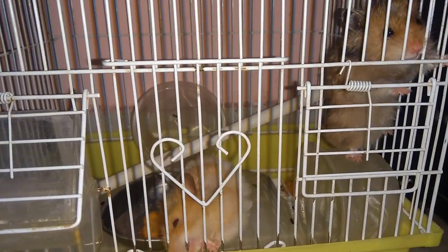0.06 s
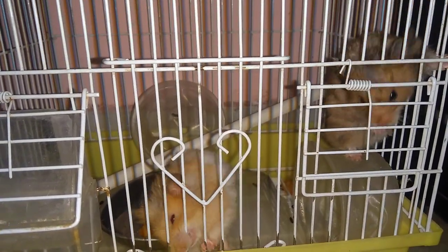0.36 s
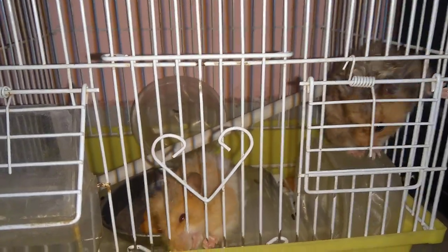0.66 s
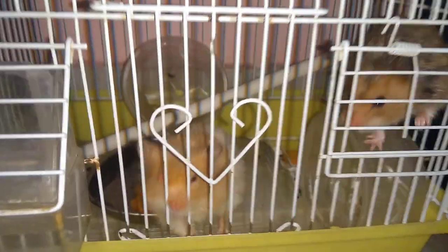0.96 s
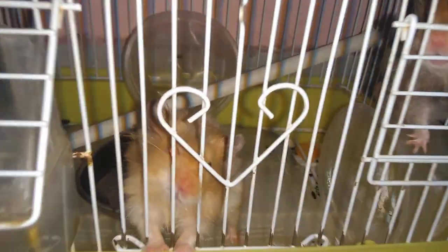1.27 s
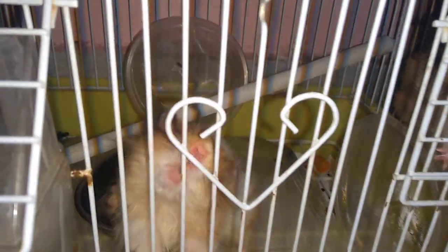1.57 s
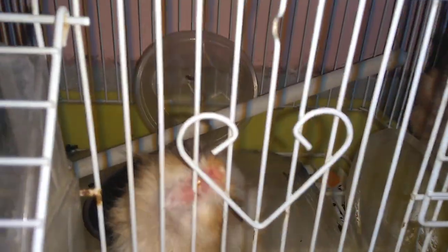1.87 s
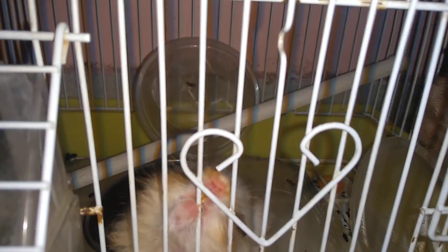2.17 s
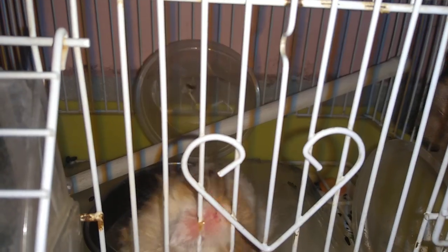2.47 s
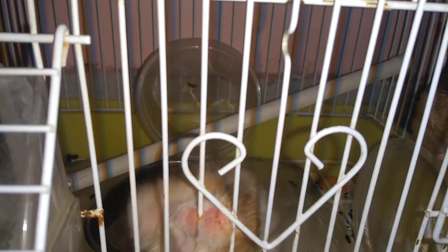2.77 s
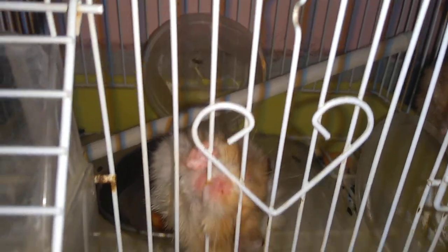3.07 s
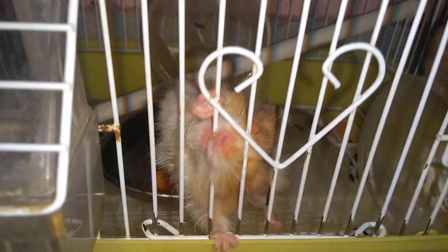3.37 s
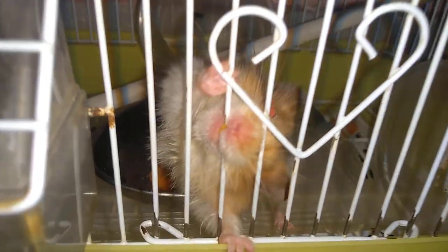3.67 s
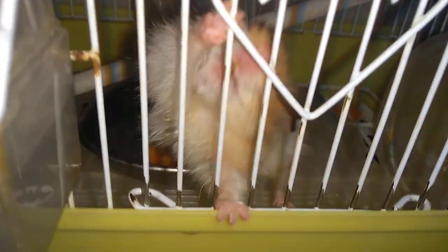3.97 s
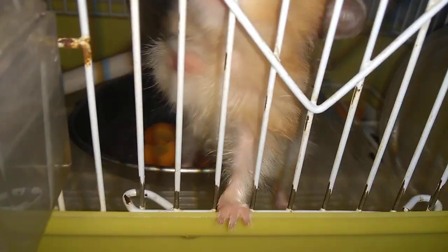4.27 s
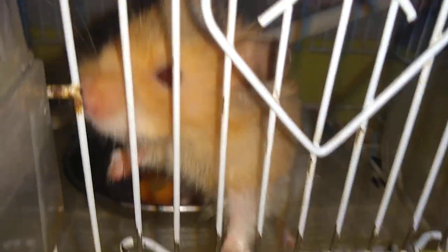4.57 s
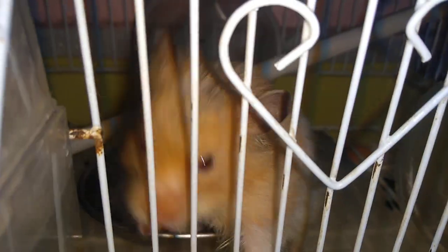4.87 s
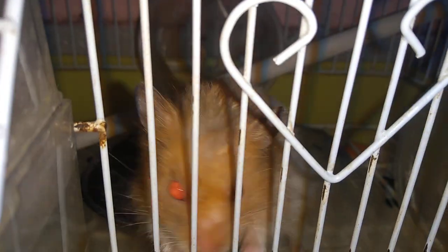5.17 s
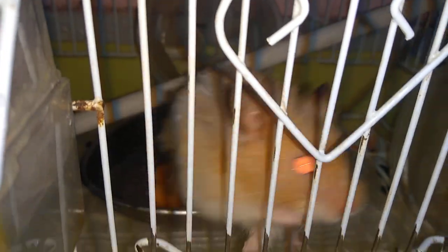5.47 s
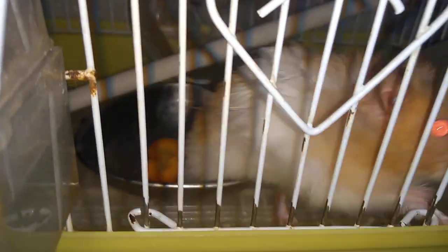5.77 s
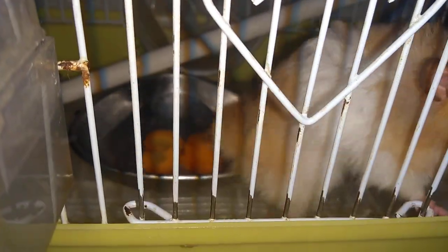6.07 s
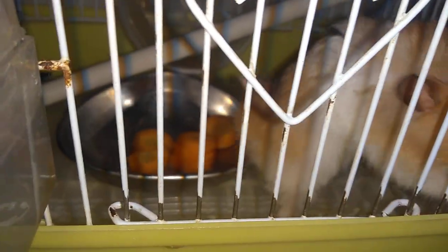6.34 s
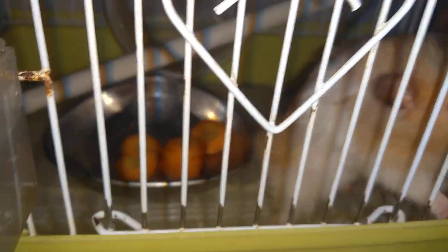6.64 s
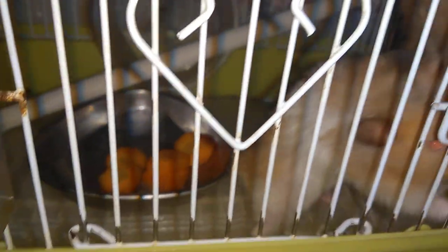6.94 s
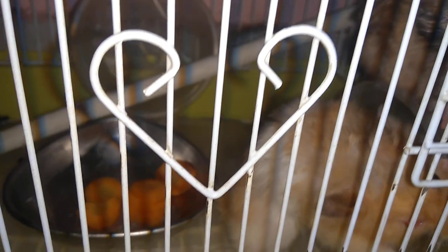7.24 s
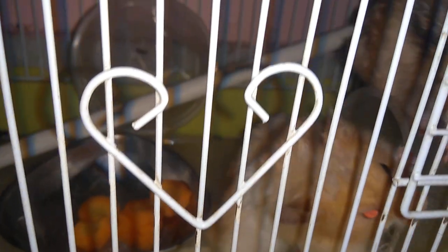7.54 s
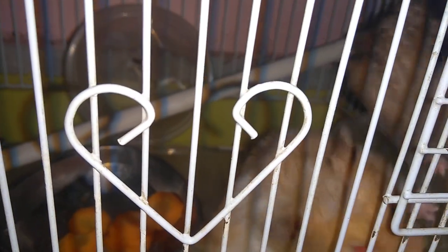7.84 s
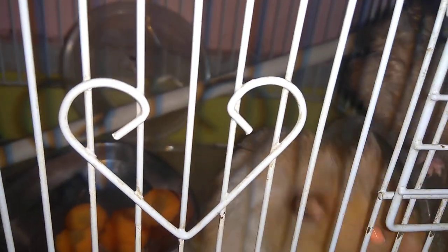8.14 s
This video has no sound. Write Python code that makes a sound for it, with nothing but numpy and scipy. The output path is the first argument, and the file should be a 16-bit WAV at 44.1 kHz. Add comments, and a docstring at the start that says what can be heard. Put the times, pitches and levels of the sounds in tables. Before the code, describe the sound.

A fan's steady hum and hiss fill a small room, with a low shuffle of the hand holding the microphone. Close by, hamsters gnaw and pluck wire cage bars, making uneven metallic clicks that ring and spring back. A soft thump comes about halfway, then a brief high squeak and sparser taps. Near the end, strained plastic ticks and gives two sharp snaps on the right, the second louder.

```python
"""A small hard room, where two hamsters clamber about a wire cage, heard from a handheld phone.
A fan hums and hisses throughout, over the low shuffle of the hand. Wires plucked by teeth and claws
click, ring and spring back; paws touch the bars, there are a few soft bumps, and a claw drags a squeak
from one bar. Beside the right microphone, strained plastic ticks, rubs and finally snaps twice."""
import sys
import numpy as np
from scipy import signal
from scipy.fft import rfft, irfft
from scipy.io import wavfile

SR = 44100
rng = np.random.default_rng(int(sys.argv[2]) if len(sys.argv) > 2 else 0)


def store_wav(level_fs):
    """Save 16-bit WAV to argv[1]."""
    pcm = np.round(np.clip(np.atleast_2d(level_fs), -1, 1) * 32767)
    wavfile.write(sys.argv[1], SR, pcm.T.astype(np.int16))


N = 366471
TIME = np.arange(N) / SR
AGE = TIME[:SR // 2]  # seconds since a blow
FREQ = np.arange(4097) * SR / 8192  # frequency grid of the filter curves, Hz

# soft bumps: start_s, pitch_hz, level_db
SOFT_BUMPS = [(1.02, 121, -37), (1.125, 58, -45), (2.663, 133, -32.5), (3.902, 85.4, -18.5),
              (3.959, 45, -29), (4.25, 55, -34)]


def undb(db):
    """Decibels to gain."""
    return 10 ** (np.asarray(db) / 20)


def unit(x):
    """Scale to an rms of one."""
    return x / np.sqrt(np.mean(x ** 2))


def fade(t60):
    """Exponential decay after a blow, 60 dB down in t60 seconds."""
    return np.exp(-np.log(1000) * AGE / t60)


def contour(points):
    """EQ curve through (Hz, dB) points."""
    hz, db = np.transpose(points)
    return undb(np.interp(np.log(FREQ + 1), np.log(hz), db))


def peaks(rows):
    """EQ curve of (centre_hz, width_hz, level_db) peaks."""
    return np.sqrt(sum(undb(2 * db) / (1 + (2 * (FREQ - hz) / width) ** 2) ** 2
                       for hz, width, db in rows))


def shape(x, gain):
    """Apply an EQ curve as a minimum-phase filter."""
    cepstrum = irfft(np.log(gain + 1e-5))
    causal = np.r_[cepstrum[0], 2 * cepstrum[1:len(gain) - 1]]
    response = irfft(np.exp(rfft(causal, len(cepstrum))))
    return signal.oaconvolve(x, response[None], axes=1)[:, :x.shape[1]]


def band(x, hz, kind):
    """Gentle low-, high- or band-pass."""
    return signal.sosfilt(signal.butter(2, hz, kind, fs=SR, output="sos"), x)


def steep_high(x, hz):
    """A high-pass applied twice."""
    return band(band(x, hz, "high"), hz, "high")


def noise(size=N):
    """Unrelated white noise for left and right."""
    return rng.standard_normal((2, size))


def flutter(depth_db, rate_hz, size=N):
    """A randomly wavering gain."""
    return undb(depth_db * unit(band(rng.standard_normal(size), rate_hz, "low")))


def pitched_noise(hz, half_width_hz):
    """A narrow band of noise that follows a pitch curve."""
    carrier = np.exp(2j * np.pi * np.cumsum(hz) / SR)
    return unit(np.real(band(noise() + 1j * noise(), half_width_hz, "low") * carrier))


def panned(db):
    """Left and right gains for a left-minus-right level."""
    return undb(np.array([[db], [-db]]) / 2)


def add(out, s, x):
    """Mix a sound in at time s."""
    start = int(s * SR)
    out[:, start:start + x.shape[1]] += x[:, :N - start]


def room(x, wet_db, t60=0.24):
    """Both sides feed a dense short tail, different at each microphone, whose treble dies first."""
    echoes = noise(len(AGE))
    treble = band(echoes, 9000, "high") * fade(.16)
    body = band(band(echoes, 8600, "low"), 10200, "low") * fade(t60)
    tail = (body + treble) * (1 - fade(0.0038))
    tail *= undb(wet_db) / np.sqrt(np.sum(tail ** 2))
    return x + signal.oaconvolve(x.sum(axis=0)[None], tail, axes=1)[:, :x.shape[1]]


def fan(rumble_db=-43, hiss_db=-48, hum_hz=275.3, hum_db=-47.5, hum_db_per_s=0.33, side_db=-19):
    """Rumble and a wavering motor hum sit in the centre; the hiss arrives from all round."""
    # tone of the rumble: frequency_hz, level_db
    rumble_eq = [(20, -33), (32, -9), (48, -3.5), (95, -0.5), (125, -2), (165, 0), (205, 6), (240, 3),
                 (300, 5.5), (345, -1), (420, -5), (560, -15), (1000, -17), (2000, -90)]
    # tone of the hiss: frequency_hz, level_db
    hiss_eq = [(100, -41), (400, -7), (560, -9), (700, -9), (900, -10), (1050, -10), (1280, -6),
               (1600, -10.5), (2250, -9), (3200, -13.5), (6300, -19.5), (8800, -22), (10000, -23),
               (11500, -28.5), (13500, -29.5), (16000, -37)]
    mid, side = unit(shape(noise(), contour(rumble_eq)))
    rumble = undb(rumble_db) * (mid + undb(side_db) * side * np.array([[1], [-1]]))
    level_drift, phase_drift = unit(band(noise(), 2.6, "low"))
    hum_gain = undb(hum_db + hum_db_per_s * TIME + 0.71 * level_drift)
    hum = hum_gain * np.sin(2 * np.pi * hum_hz * TIME + 0.94 * phase_drift)
    return rumble + hum + undb(hiss_db) * unit(shape(noise(), contour(hiss_eq)))


def fan_bounce(db_at_1khz=-48.5, db_per_octave=-3):
    """Hiss bouncing off the cage front reinforces one band, pitched by the moving phone's distance."""
    # path of the reinforced band: time_s, pitch_hz
    glide = [(0, 939.6), (.9, 972), (1.6, 1029), (3.2, 1059), (4.0, 1275), (8.3, 1187)]
    hz = np.interp(TIME, *np.transpose(glide))
    db = db_at_1khz + db_per_octave * np.log2(hz / 1000)
    return undb(db) * pitched_noise(hz, half_width_hz=197)


def fan_hollow():
    """A narrow, hollow band of the hiss rings; as the phone nears the cage it fades from the right."""
    # path of the resonance: time_s, pitch_hz, left_db, right_db
    glide = [(0, 791, -48, -47.5), (0.998, 808, -57, -51), (2.0, 862.5, -53.5, -62.5), (4.4, 872, -55, -69),
             (8.3, 874.5, -54.5, -68)]
    s, hz, left_db, right_db = np.transpose(glide)
    gain = undb([np.interp(TIME, s, left_db), np.interp(TIME, s, right_db)])
    return gain * pitched_noise(np.interp(TIME, s, hz), half_width_hz=48)


def handling(rest_db=-59, moving_db=-50, move_s=0.94):
    """The hand's low shuffle swells around each bump and reaches both sides through the phone's body."""
    moving = np.max([np.exp(-((TIME - s) / move_s) ** 2) for s, _, _ in SOFT_BUMPS], axis=0)
    db = rest_db + (moving_db - rest_db) * moving
    return undb(db) * unit(band(rng.standard_normal(N), [50, 150], "band"))


def wire_click(db, body_db, top_db, rise_t60, ring_t60, top_t60=0.11, spread_db=0.2, detune=0.0094):
    """One blow spreads through the welded bars as a gritty rattle; each bar rings a little differently."""
    # modes of the wires, relative to the broad click: pitch_hz, width_hz, level_db
    wire_modes = [(495, 28, 10), (1375, 60, 10), (2220, 130, 3.5), (3060, 150, 10), (3510, 180, 8.5),
                  (4530, 240, 10), (5680, 160, 7), (6650, 120, 7), (7060, 100, 3), (7470, 51, -2),
                  (7980, 88, 6.5), (8220, 110, 6.5), (8750, 150, 5.5), (9220, 150, 5), (14400, 250, 10),
                  (15600, 220, 7)]
    # tone of the broad click: frequency_hz, level_db
    click_eq = [(200, -27), (550, 4), (1000, 0), (1700, -1), (4000, -2.5), (5000, -1), (7500, 2),
                (9500, -1.5), (11500, 3.5), (13000, -3.5), (15000, -5)]
    grit = flutter(depth_db=3, rate_hz=830, size=len(AGE))
    catches = flutter(depth_db=1.26, rate_hz=107, size=len(AGE))  # the teeth catch and slip
    rattle = noise(len(AGE)) * grit * catches * (1 - fade(rise_t60)) * fade(ring_t60)
    body = undb(body_db) * band(rattle, 1970, "low")
    middle = band(rattle, [2000, 8000], "band")
    top = undb(top_db) * band(rattle, 7000, "high") * fade(top_t60)
    modes = [(hz * (1 + detune * rng.standard_normal()), width, mode_db - rng.normal(0, spread_db))
             for hz, width, mode_db in wire_modes]
    freedom = np.interp(db, [-40, -26], [.35, 1])  # a light touch keeps the paw on and mutes the modes
    colour = unit(contour(click_eq) * np.hypot(1, freedom * peaks(modes)))
    click = undb(db) * shape(body - middle + top, colour)
    return room(click, wet_db=-3)  # every spot has its own echoes


def wire_note(hz, db, t60=0.087):
    """The plucked wire itself sings on briefly with one clean note."""
    note = np.sin(2 * np.pi * hz * AGE) * fade(t60) * (1 - fade(0.0083))
    return room(undb(db) * note * panned(0.4), wet_db=-10)


def wires(pluck_trim_db=-3.5, lead_s=.0014):
    """Plucks, their softer, duller rebounds and light touches ring the same bars."""
    # teeth and claws pluck a wire: start_s, level_db, body_db, top_db, ring_t60_s, note_hz, note_db
    plucks = [(0.0889, -21, -12, -1.5, 0.072, 4683, -20), (0.1144, -28.5, 5, -2, 0.08, 4530, -20),
              (0.2803, -24, 2, -5, 0.055, 4470, -21), (0.9853, -29.5, -5, -1.5, 0.077, 4840, -11),
              (1.3349, -24, 0, -3.5, 0.059, 4530, -18), (1.705, -24, 6, 2, 0.068, 4554, -11),
              (1.8801, -25.5, 5.5, -1.5, 0.063, 4560, -14), (2.2509, -24.5, 6.5, 2.5, 0.067, 4520, -17),
              (2.4584, -29.5, 6.5, -5, 0.058, 4530, -18), (2.8814, -23, 5, 1.5, 0.056, 4600, -19),
              (3.04, -21.5, -5, -1, 0.041, 4500, -18), (3.3083, -25, -1.5, -6, 0.066, 4440, -15),
              (3.489, -25, 4.5, -4, 0.1, 4500, -16), (3.6342, -32.5, 8, 0.5, 0.12, 4520, -16),
              (3.905, -36.5, 3.5, -9, 0.2, 4530, -18), (4.0612, -26, -5, -3, 0.059, 4600, -25),
              (5.302, -30.5, 3.5, -3, .079, 4420, -24)]
    # a released wire springs back against the teeth: start_s, level_db
    rebounds = [(1.741, -37), (2.291, -33), (2.918, -34), (3.539, -35.5), (3.672, -36.5), (3.942, -40),
                (5.355, -41)]
    # paws and teeth touch the bars lightly: start_s, level_db, ring_t60_s
    touches = [(0.083, -36.5, 0.056), (0.5212, -39.5, 0.044), (0.5344, -42, .07), (0.5844, -48, .04),
               (0.617, -43.5, 0.087), (0.6444, -44.5, 0.11), (0.7946, -40.5, 0.09), (0.9765, -39.5, .04),
               (1.0979, -39, 0.047), (1.3179, -38, 0.053), (1.4057, -36.5, 0.043), (1.4536, -43, 0.057),
               (1.6144, -44.5, .04), (2.2124, -43, 0.075), (3.2485, -41, 0.082), (4.2707, -43, .11),
               (5.7927, -44, 0.1), (5.9918, -41, .1), (6.0362, -43.5, 0.13), (6.0741, -41, 0.031),
               (7.441, -46, 0.1), (7.6494, -42, 0.063)]
    out = np.zeros((2, N))
    for s, db, body_db, top_db, t60, note_hz, note_db in plucks:
        pluck_db = db + pluck_trim_db
        add(out, s, wire_note(note_hz, pluck_db + note_db))
        add(out, s - lead_s, wire_click(pluck_db, body_db, top_db, rise_t60=0.014, ring_t60=t60))
    for s, db in rebounds:
        add(out, s - lead_s, wire_click(db, body_db=3, top_db=-13, rise_t60=0.013, ring_t60=0.052))
    for s, db, t60 in touches:
        add(out, s - lead_s, wire_click(db, body_db=5, top_db=-16.5, rise_t60=0.015, ring_t60=t60))
    return out


def bumps(t60=0.24, rise_t60=0.017):
    """Each soft knock swells and dies away as one low tone."""
    out = np.zeros((2, N))
    for s, hz, db in SOFT_BUMPS:
        thud = -np.sin(2 * np.pi * hz * AGE) * fade(t60) * (1 - fade(rise_t60))
        add(out, s, undb(db) * thud * panned(-0.3))
    return out


def thin_scrapes(t60=0.036):
    """Faint, thin, high scrapes, one leading into a plastic tick."""
    # short, high scrapes: start_s, level_db
    scrapes = [(2.5605, -35), (7.357, -36), (7.401, -28)]
    out = np.zeros((2, N))
    for s, db in scrapes:
        rasp = band(noise(len(AGE)), [8300, 10700], "band") * fade(t60) * (1 - fade(0.011))
        add(out, s, undb(db) * rasp)
    return room(out, wet_db=-9)


def plastic_ring(position, rise_t60=0.0039):
    """The plastic rings; where it gives way (0 rim, 1 middle) sets the balance of its modes."""
    # modes of the plastic: pitch_hz, t60_s, rim_db, middle_db
    modes = [(413, 0.021, -22, -9), (598, 0.016, -8, -10), (900, 0.038, -21, -21.5), (1390, 0.0067, 6, -29),
             (2316, 0.026, -12, -24), (3150, 0.012, -4, -34), (3360, 0.0098, -12, -0.5),
             (3640, 0.011, -33, -9), (4750, 0.013, -22, -6.5), (5380, 0.013, -23, -13.5),
             (5950, 0.011, -19, -13), (6700, .012, -25, -20), (7800, 0.016, -16, -15.5),
             (8600, 0.015, -11, -18), (9270, .012, -18, -21), (10300, 0.012, -13, -35),
             (11470, 0.011, -15, -32)]
    ring = 0
    for hz, t60, rim_db, middle_db in modes:
        gain = undb(rim_db + position * (middle_db - rim_db))
        ring -= gain * np.cos(2 * np.pi * hz * AGE) * fade(t60)
    return ring * (1 - fade(rise_t60))


def plastic_ticks(ring_db=-3, crack_db=-5, edge_db=-37, crack_t60=0.018, catch_s=0.0073):
    """The plastic slips slightly, catching twice; even the softest tick has a thin, bright edge."""
    # small slips close by: start_s, level_db, pan_db (positive is left), knock_db, second_catch_db
    slips = [(2.5652, -24.5, -1, 2, -5), (5.453, -36, -16, -5, -9), (6.4335, -53, -8, 0, -12),
             (7.5535, -30, -2, -6, -20), (7.6332, -30, 6, -4, -10), (7.924, -22, 3, 3, -22)]
    ring = undb(ring_db) * plastic_ring(position=0.7) * panned(-18)
    out = np.zeros((2, N))
    for s, db, pan_db, knock_db, catch_db in slips:
        for delay_s, slip_db in [(0, 0), (catch_s, catch_db)]:
            burst = noise(len(AGE)) * fade(crack_t60)
            edge = undb(edge_db) * steep_high(burst, 9800)
            knock = undb(knock_db) * band(burst, [600, 1700], "band")
            crack = undb(crack_db) * band(burst, 9400, "low")
            tick = edge + undb(db) * (ring + knock + crack)
            add(out, s + delay_s, undb(slip_db) * panned(pan_db) * tick)
    return room(out, wet_db=-9)


def bar_squeak(start_s=4.9525, db=-27.5, rasp_db=-24, split_hz=5800):
    """A claw drags down a bar in uneven slips; the lower bands of noise join as it presses harder."""
    # bands of noise that colour the short, rough squeak: centre_hz, width_hz, level_db
    noise_bands = [(2420, 490, -7), (4590, 270, -3), (4860, 240, -3.5), (5430, 150, -10), (6680, 380, 3),
                   (6900, 240, -5), (7200, 260, 4.5), (7650, 300, -10), (8270, 400, -6), (8800, 260, -6),
                   (9040, 260, -3), (9500, 280, -10), (10600, 350, -15)]
    swell_s, hold_s, release_s, swell_db = .011, .0135, .012, 10
    age = TIME - start_s
    swell = undb(swell_db * (np.clip(age / swell_s, 0, 1) - 1))
    release = np.clip(1 - (age - swell_s - hold_s) / release_s, 0, 1) ** 2
    grip = (age > 0) * swell * release
    slips = flutter(depth_db=2, rate_hz=700) * noise() * grip * undb(db)
    low = peaks([row for row in noise_bands if row[0] < split_hz])
    high = peaks([row for row in noise_bands if row[0] >= split_hz])
    squeak = (shape(slips * swell, low) + shape(slips, high)) / np.sqrt(np.mean(low ** 2 + high ** 2))
    rasp = undb(rasp_db) * band(slips, 9000, "high")
    return room((squeak + rasp) * panned(-2), wet_db=-8.5)


def plastic_rub(start_s=7.24, end_s=7.93, end_db=-52, db_per_s=8):
    """A faint, uneven rub grows with the strain until the last snap releases it."""
    strain = (TIME > start_s) * (TIME < end_s) * undb(end_db + db_per_s * (TIME - end_s))
    uneven = flutter(depth_db=3, rate_hz=60)
    colour = contour([(300, -6), (650, 13), (1600, -8), (3800, 1), (7000, -6), (10000, -5),
                      (12000, -16), (15000, -12)])
    return unit(shape(noise(), colour)) * strain * uneven * panned(-2)


def plastic_snaps(left_db=-12, left_lag_s=0.00027, crack_t60=0.021):
    """Strained plastic lets go: a ring, strongest on the right, and a spray of tiny cracks."""
    # a snap at the rim, then one in the middle: start_s, level_db, crack_db, clatter_db, low_cut_hz
    snaps = [(7.5665, -4.5, -12, -33, 1030), (7.9431, 1.5, -19.5, -6, 170)]
    rings, cracks, clatter = np.zeros((3, 2, N))
    colour = unit(contour([(300, 9.5), (900, 10), (1400, -3), (3200, 3.5), (4300, -4), (5500, 6.5),
                           (9000, 0.5), (11000, -10), (15000, -9)]))
    for position, (s, db, crack_db, clatter_db, low_cut_hz) in enumerate(snaps):
        # the smaller the part that moves, the less bass it radiates
        ring = undb(db) * steep_high(plastic_ring(position), low_cut_hz)
        burst = noise(len(AGE)) * fade(crack_t60) * (1 - fade(0.0017))
        crack = undb(db) * steep_high(burst, low_cut_hz)
        bright = band(band(crack, [2950, 4150], "band"), [2500, 6000], "band")
        add(rings, s, np.outer([0, 1], ring))
        add(rings, s + left_lag_s, np.outer([undb(left_db), 0], ring))
        add(cracks, s, undb(crack_db) * shape(crack, colour) * panned(4))
        add(clatter, s, undb(clatter_db) * bright)
    # the ring stays close and dry; the cracks and their clatter carry into the room
    return rings + room(cracks, wet_db=-11) + room(clatter, wet_db=-10, t60=0.22)


def scene():
    """Wire and plastic up front, over a bed of bumps, handling and fan."""
    cage = wires() + plastic_snaps() + plastic_ticks() + plastic_rub() + bar_squeak() + thin_scrapes()
    return cage + bumps() + handling() + fan() + fan_bounce() + fan_hollow()


def record(dry, low_cut_hz=35, ceiling=.88, top_hz=15900):
    """Each microphone has its own colour; deep bass is lost, the hardest snap clips, the top is cut."""
    # tonal balance of the two microphone ports: frequency_hz, left_minus_right_db
    balance = [(80, 0), (300, -2.5), (1200, -0.5), (2200, -1.5), (4500, -3), (6000, 0), (7300, 2.5),
               (8700, 13), (10000, 7.5), (11500, -2), (13000, 3.5), (15000, -8)]
    tilt = np.sqrt(contour(balance))
    coloured = np.vstack([shape(dry[:1], tilt), shape(dry[1:], 1 / tilt)])
    clipped = np.clip(band(coloured, low_cut_hz, "high"), -ceiling, ceiling)
    return signal.sosfilt(signal.ellip(10, .2, 70, top_hz, fs=SR, output="sos"), clipped)


dry = scene()
out = record(dry)
store_wav(out)
```